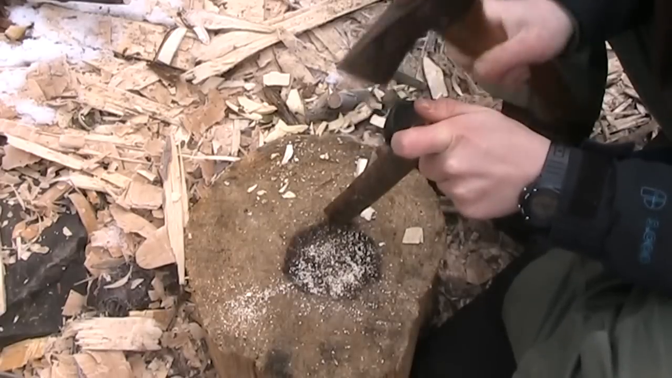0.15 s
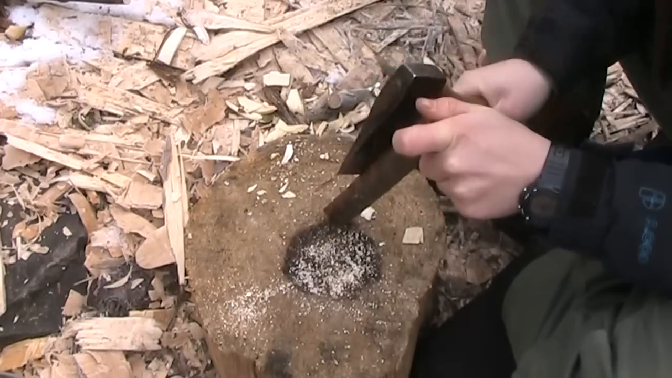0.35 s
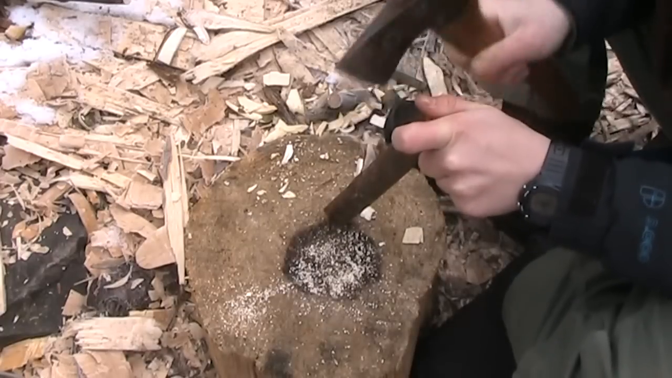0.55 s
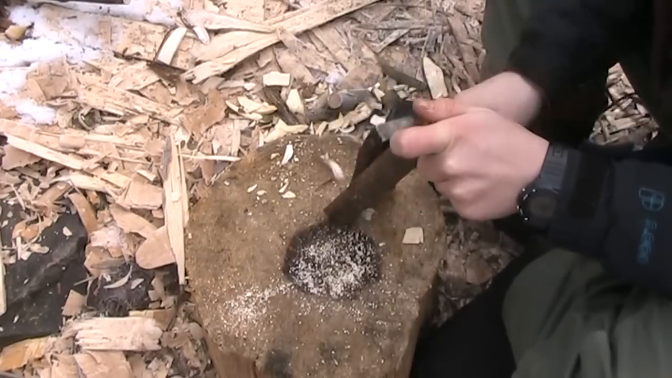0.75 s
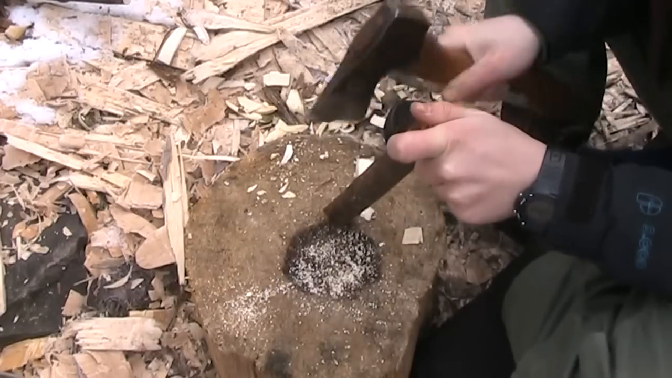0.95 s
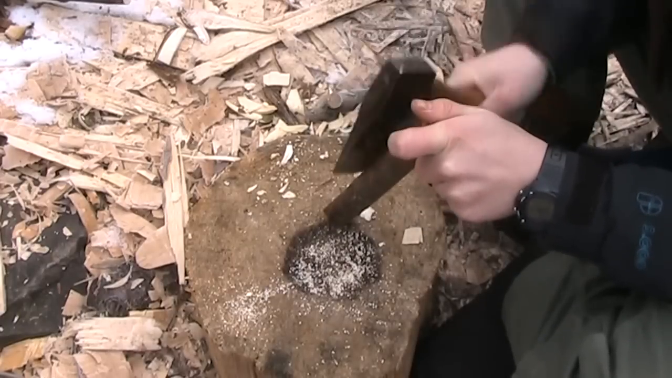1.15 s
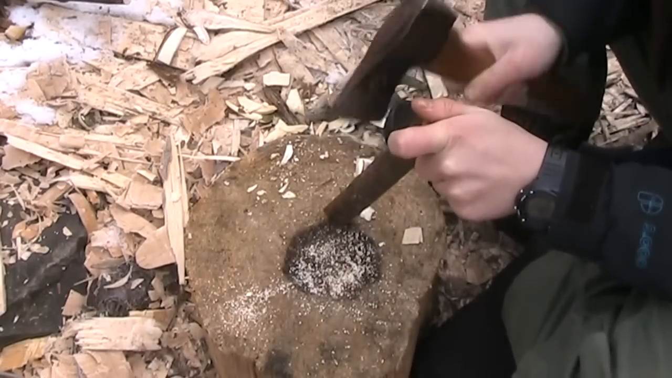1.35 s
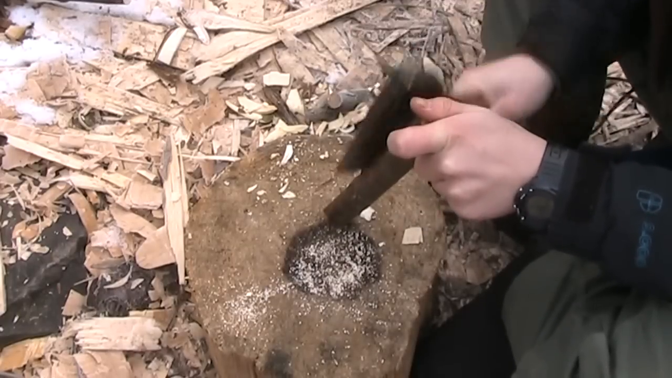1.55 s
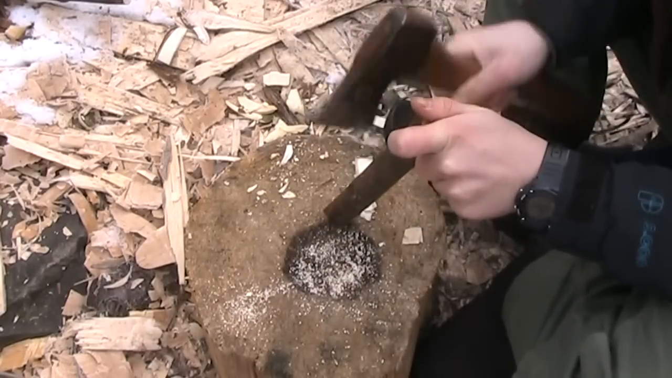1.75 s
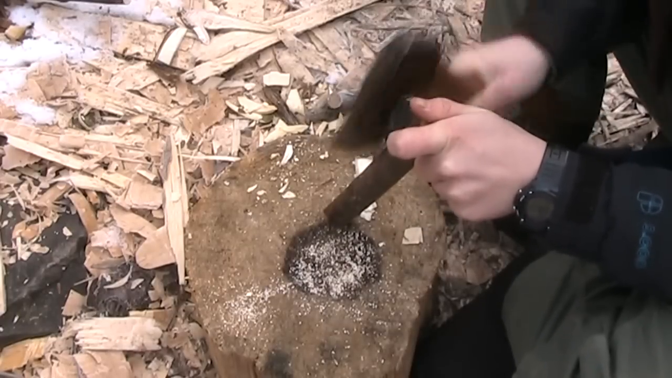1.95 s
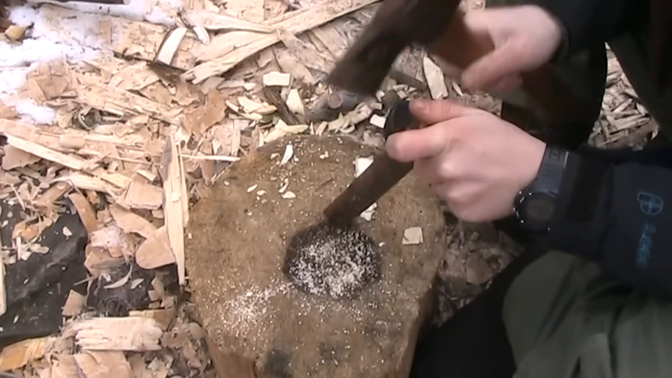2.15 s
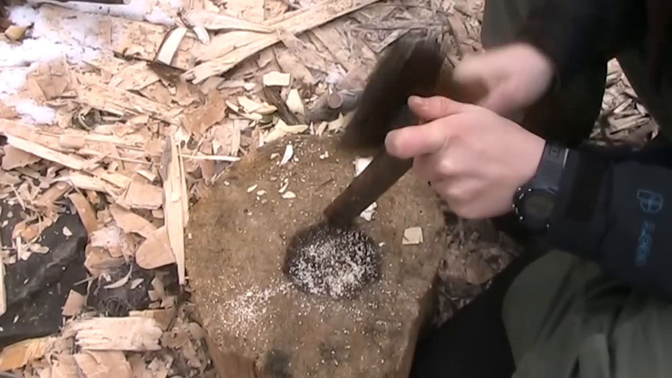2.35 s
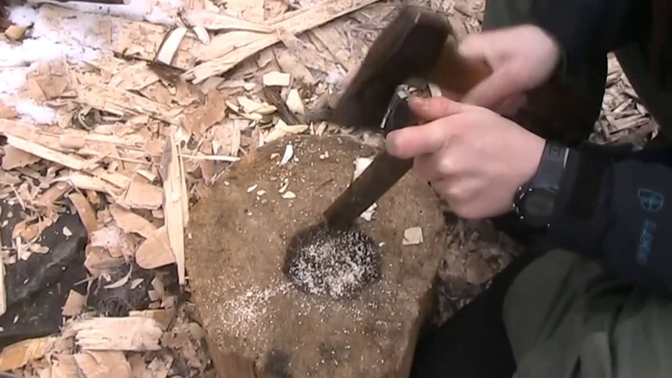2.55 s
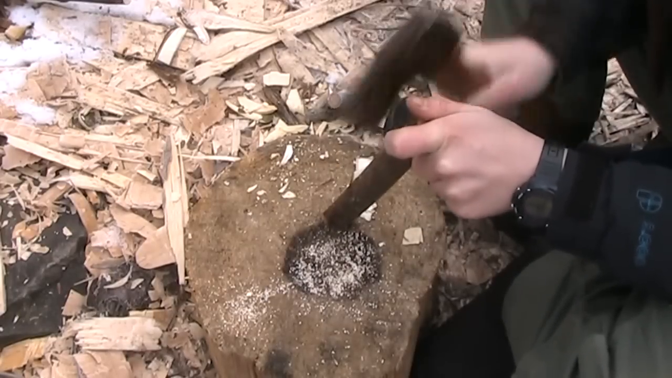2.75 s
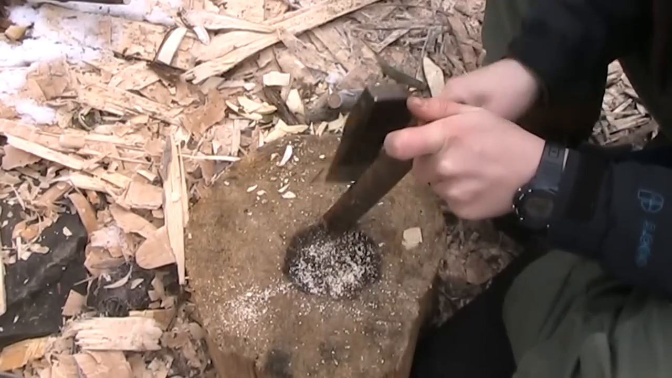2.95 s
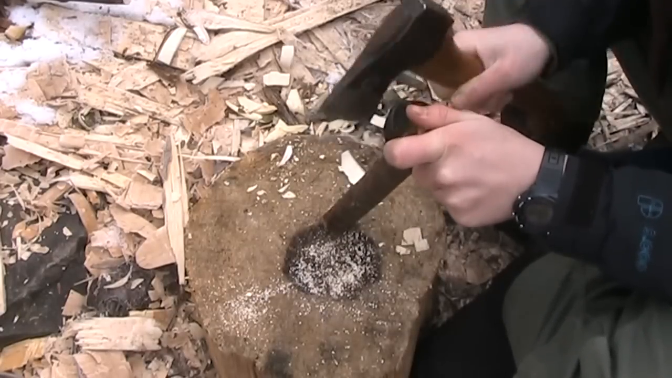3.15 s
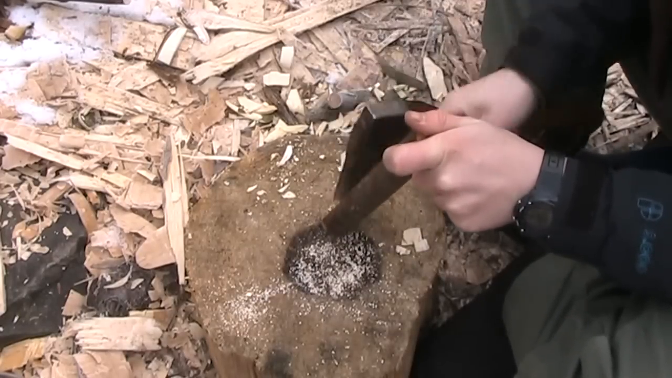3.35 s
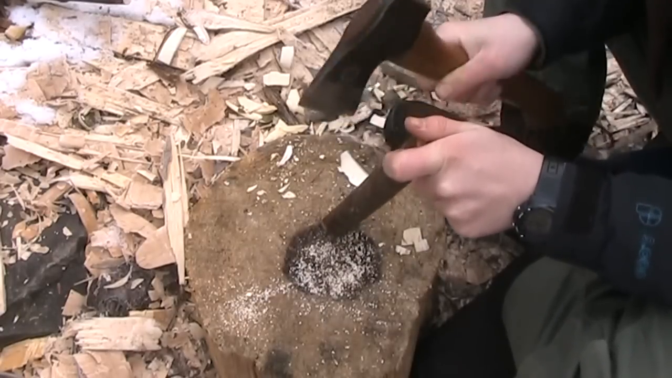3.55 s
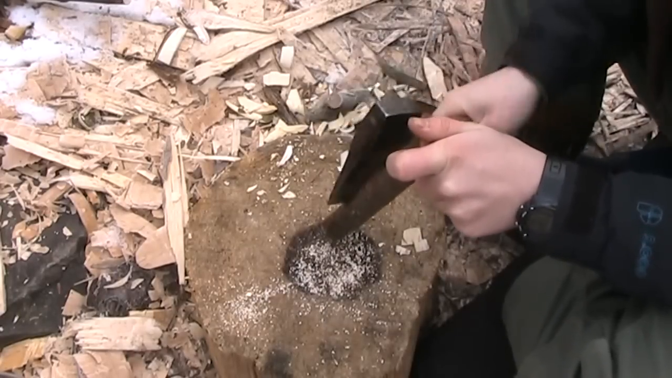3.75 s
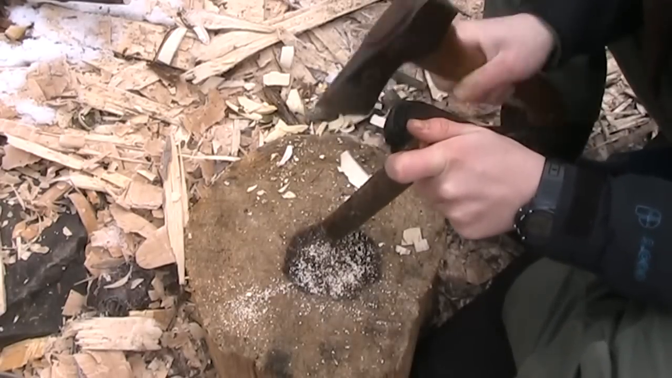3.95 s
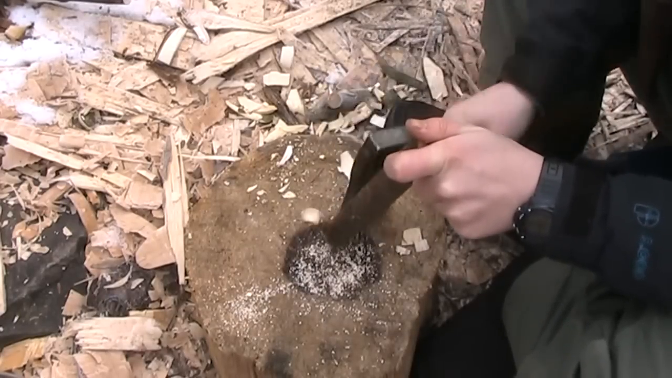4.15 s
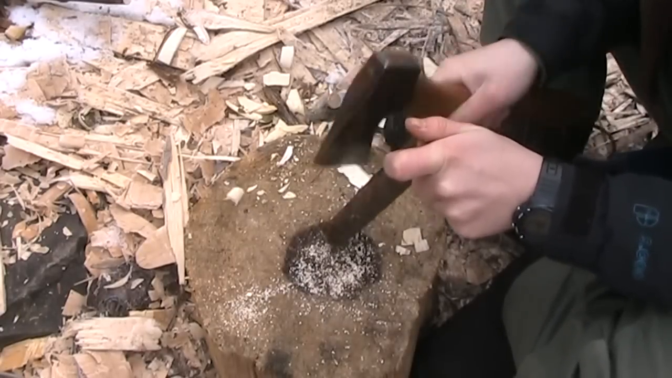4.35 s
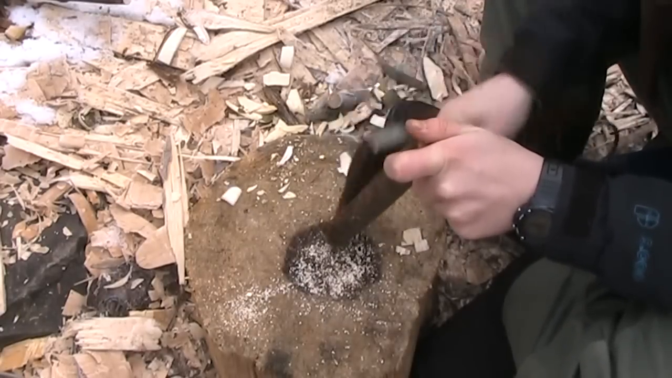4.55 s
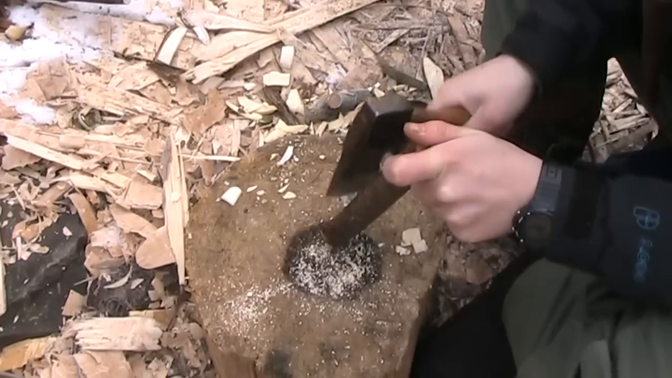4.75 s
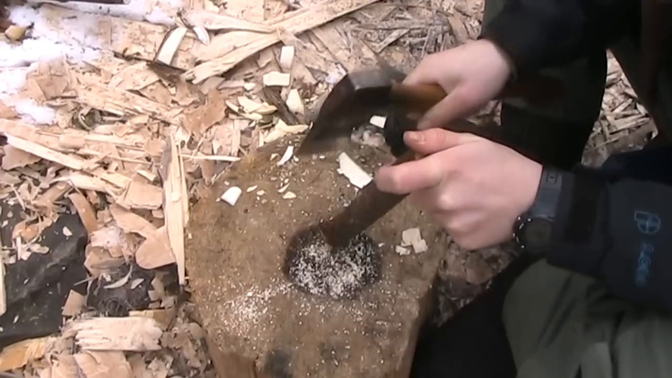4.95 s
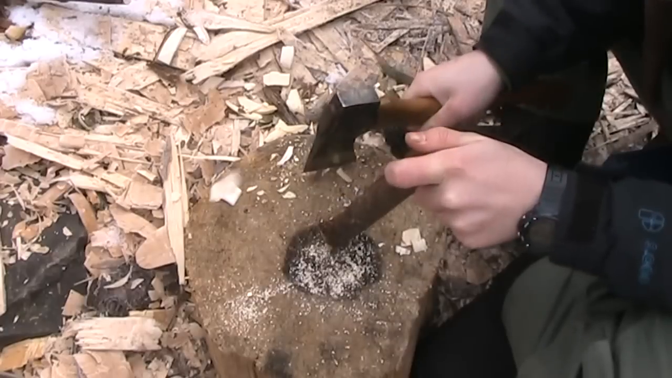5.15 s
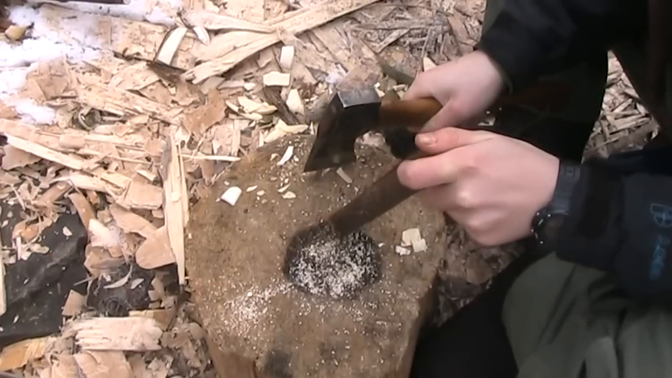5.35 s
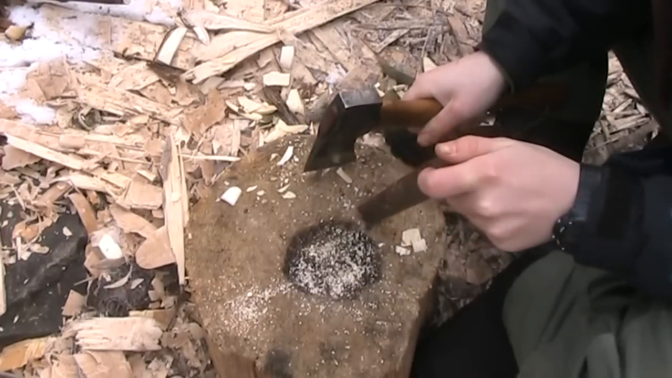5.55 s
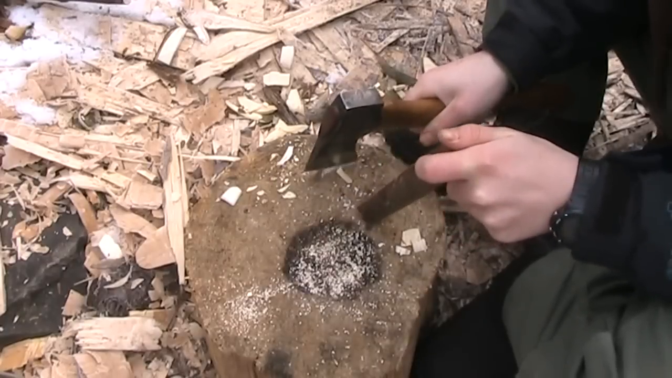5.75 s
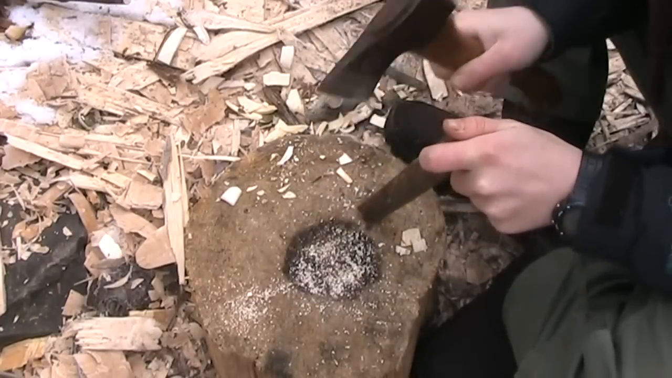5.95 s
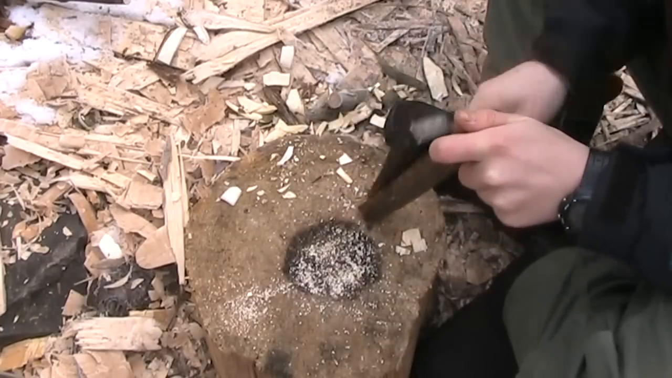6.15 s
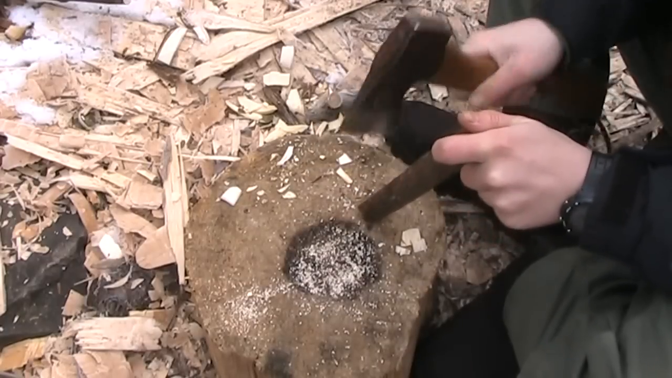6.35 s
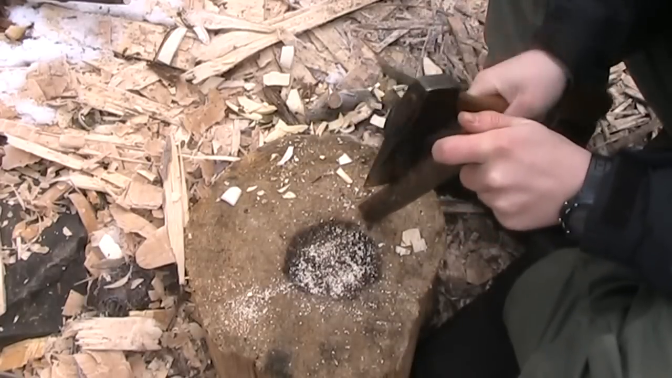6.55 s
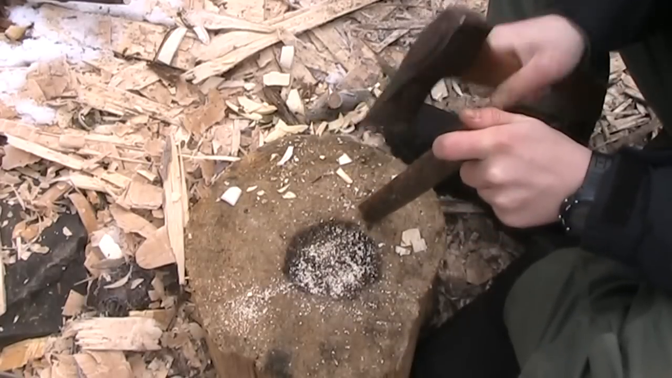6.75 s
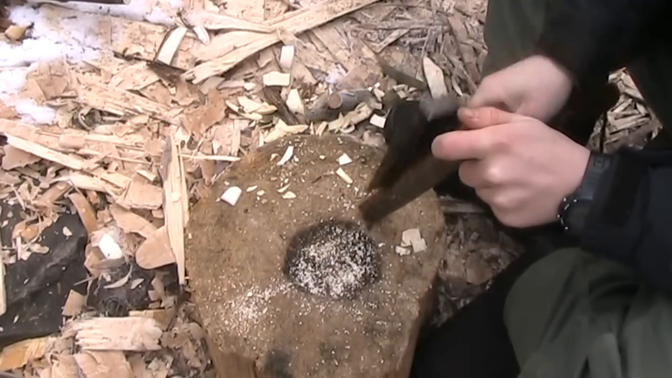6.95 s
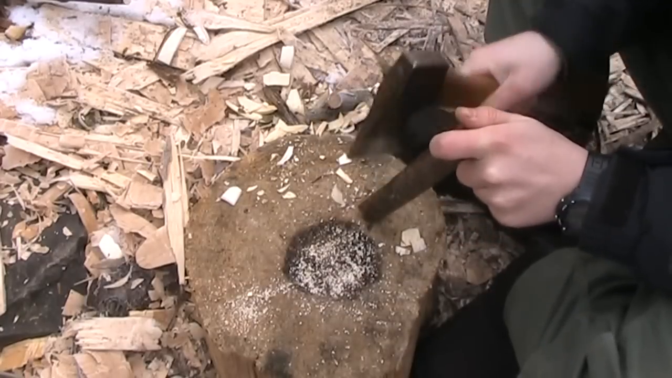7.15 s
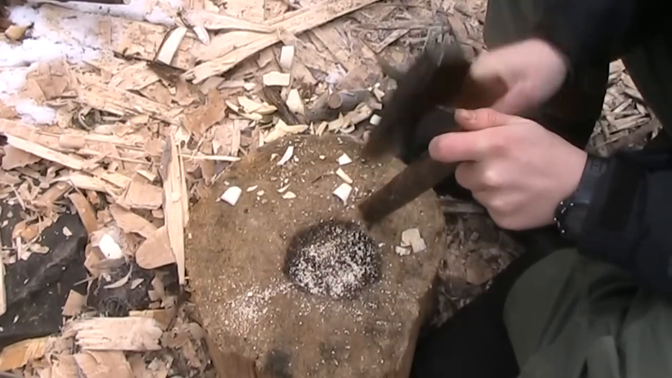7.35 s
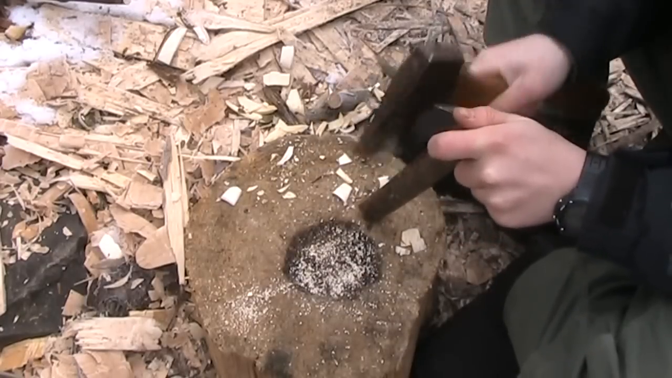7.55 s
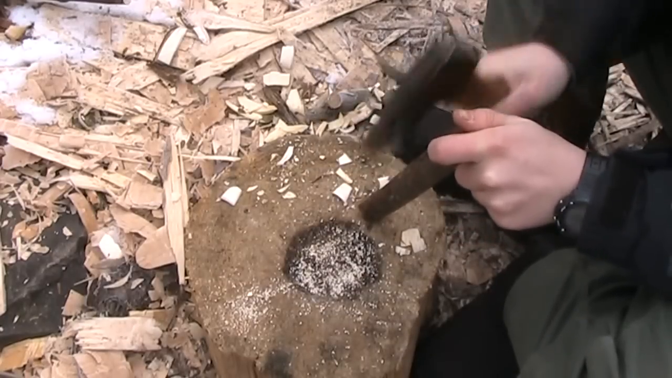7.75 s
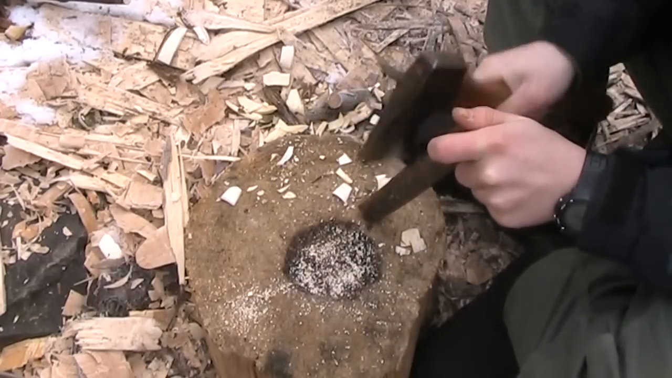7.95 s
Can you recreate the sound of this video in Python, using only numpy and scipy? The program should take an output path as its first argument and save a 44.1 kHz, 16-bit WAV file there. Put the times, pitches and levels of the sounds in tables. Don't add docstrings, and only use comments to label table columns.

```python
import sys
import numpy as np
from scipy import signal
from scipy.fft import rfft, irfft, next_fast_len
from scipy.io import wavfile
from scipy.ndimage import uniform_filter1d, map_coordinates

SR = 44100
rng = np.random.default_rng(int(sys.argv[2]) if len(sys.argv) > 2 else 0)


def level_to_linear(level):
    exponent = np.asarray(level, float) / 20
    return 10 ** exponent


def transcribe(signal):
    frames = np.atleast_2d(signal).T
    limited = np.clip(frames, -1, 1)
    pcm = np.round(limited * 32767).astype(np.int16)
    wavfile.write(sys.argv[1], SR, pcm)


N = 352359

# start [s], knock [dB], stick bending [dB], steel [dB], fibre snap [dB].
BITES = [(0.256, -29, -21.5, -36, -32), (0.6597, -6, -13, -24, -20.5), (0.6738, -0.5, -11, -11.5, -13.5),
         (1.1098, -10.5, -24.5, -31.5, -24), (1.5089, 1, -11.5, -11, -36.5), (1.93, 4.5, -11.5, -14, -22),
         (2.3254, 3, -10, -12.5, -21.5), (2.7385, 4.5, -10.5, -12.5, -9), (3.1957, 1.5, -17, -17.5, -19.5),
         (3.6445, 0.5, -12.5, -16, -19), (4.063, 1.5, -17.5, -11, -16.5), (4.4946, -1.5, -17.5, -16.5, -23),
         (4.966, -13, -19, -9, -10), (6.082, 1, -15.5, -18.5, -14), (6.5064, 3, -9.5, -8.5, -16),
         (6.8968, 0.5, -16, -19, -26.5), (7.3431, -2.5, -13.5, -20, -40), (7.7438, 3.5, -12, -9, -20)]
# knock [Hz], bending [Hz], steel [Hz], damping [factor].
GRIPS = [(1600, 1050, 3400, 2.9), (1670, 1120, 4200, 1.3), (1900, 990, 4830, 1.2), (1710, 1210, 6600, 0.59),
         (1710, 1140, 4500, 1.09), (1744, 1180, 4150, 1.2), (1755, 1130, 4500, 1.33),
         (1835, 1190, 4480, 1.32), (1800, 1160, 4225, 0.75), (1900, 1290, 4320, 1.1),
         (1790, 1250, 4140, 0.79), (1735, 1224, 4360, 0.85), (1580, 1040, 4820, 1.9),
         (1860, 1135, 4370, 0.92), (1814, 1220, 4380, 1.2), (1675, 1200, 4420, 0.93),
         (1700, 1294, 4320, 0.93), (1810, 1310, 4550, 1.18)]
# low, middle and high mode [dB over the knock].
FREED = [(10, 1, -17.5), (-1.5, -7.5, -30.5), (-18.5, -27, -5), (0.5, -0.5, -11), (-10, 0, -4),
         (-16, -17, -4.5), (-9, -23, 1), (-16.5, -11, 1.5), (-9.5, -17.5, -12.5), (-19, -24, -29),
         (-12, -19, -7), (-6.5, -34, -16), (-4.5, 7, -10.5), (-15.5, -16.5, -6), (-16.5, -0.5, -7),
         (-19.5, -4, -4.5), (-4.5, -28, -20.5), (-20, -28, -9.5)]
# peak of first swing [s], first swing [dB], pitch [Hz], second swing [dB over the
THUDS = [
    (0.7199, -2.8, 334, -7.8),
    (2.7799, -5.7, 345, -4.9),
    (3.2474, -3.1, 337, -6.6),
    (4.1045, -5.5, 328, -5.3),
    (4.5291, -1.1, 327, -9.7),
    (4.9686, -10.2, 359, -3.5),
    (6.1426, -5.1, 338, -3.6),
    (6.9595, -5.4, 340, -2.1),
]
# share of steel pitch [ratio], width [Hz], level [dB].
STEEL = [(1, 270, -0.5), (1.08, 320, -11.5), (1.159, 299.5, -13)]
# frequency [Hz], width [Hz], level [dB].
HEAD = [(4200, 82, -17), (5860, 240, -13), (6850, 310, -10), (10780, 1800, -16), (4220, 39, -28)]
LOOSE_GRIP = (2114, 1210, 4369)
CRACK_LENGTH = SR // 16


def unit(x):
    return x / np.sqrt(np.mean(x ** 2) + 1e-20)


def along(points, hz):
    f, v = np.transpose(points)
    return np.interp(np.log(hz + 1), np.log(f + 1), v)


def curves(rows, outside=None):
    s, *cols = np.transpose(rows)
    return [np.interp(np.arange(N) / SR, s, c, outside, outside) for c in cols]


def wobble(rate):
    knots = rng.standard_normal(int(N * rate / SR) + 4)
    return map_coordinates(knots, [np.arange(N) * rate / SR])


def filtered(x, response):
    m = next_fast_len(N + SR // 2)
    return irfft(rfft(x, m) * response(np.fft.rfftfreq(m, 1 / SR)), m)[..., :N]


def colour(x, spectrum):
    return filtered(x, lambda hz: level_to_linear(along(spectrum, hz)))


def resonate(x, modes):
    def body(f):
        total = 0
        for k, (c, w, db) in enumerate(modes):
            total = total + (-1) ** k * level_to_linear(db) * 1j * f * w / (c * c - f * f + 1j * f * w)
        return total
    return filtered(x, body)


def band(x, order, hz, kind):
    return signal.sosfilt(signal.butter(order, hz, kind, fs=SR, output="sos"), x)


def rush(spectrum, patchy_db):
    # frequency [Hz], side over mid [dB].
    side_over_mid = [(60, -27), (110, -18), (200, -4), (380, 1), (700, 2), (1290, 2), (2380, 3), (4400, 1),
                     (8120, -1), (15000, 1)]
    z = signal.stft(rng.standard_normal((2, N)), nperseg=512)[2]
    field = uniform_filter1d(uniform_filter1d(rng.standard_normal(z.shape[1:]), 6, 0), 14, 1)
    pair = signal.istft(z * level_to_linear(patchy_db * unit(field)), nperseg=512)[1][:, :N]

    def spread(hz):
        angle = np.arctan(level_to_linear(along(side_over_mid, hz)))
        return level_to_linear(along(spectrum, hz)) * [np.cos(angle), np.sin(angle)]
    mid, side = filtered(pair, spread)
    return unit(np.array([mid + side, mid - side]))


def crack(grip, freed, knock_db, bend_db, steel_db, snap_db, damping, snap_t60, rise,
          climb=0, thin=1, swell=0, head_db=0, steel_climb=0, lag=0):
    # share of knock pitch [ratio], width [Hz], level [dB].
    knock_modes = [(0.9054, 239, 5), (0.773, 160, -7.5)]
    # share of bending pitch [ratio], width [Hz], level [dB].
    bend_modes = [(0.719, 275.5, -2), (1.002, 413, 11)]
    # frequency [Hz], width [Hz].
    side_modes = [(630, 168), (2290, 220), (2890, 237)]
    t = np.arange(CRACK_LENGTH) / SR
    knock_hz, bend_hz, steel_hz = grip
    wood, metal = rise + lag, rise + swell
    # Hz, width Hz, dB, rise s, climb Hz per ms
    modes = [(share * knock_hz, w, db + knock_db, wood, climb) for share, w, db in knock_modes]
    modes += [(hz, w, db + knock_db, wood, 0) for (hz, w), db in zip(side_modes, freed)]
    modes += [(share * bend_hz, w, db + bend_db, wood + 0.00017, 0) for share, w, db in bend_modes]
    modes += [(share * steel_hz, thin * w, db + steel_db, metal, steel_climb) for share, w, db in STEEL]
    modes += [(hz, thin * w, db + steel_db + head_db, metal, 0) for hz, w, db in HEAD]
    modes += [(4480, 7700, snap_db - 21, rise, 0)]
    ring = 0
    for hz, w, db, start, up in modes:
        detune, luck_db = rng.standard_normal(2) * [.006, 1]
        swelling = 1 - np.exp(-(t / start) ** 2)
        decay = np.exp(-np.pi * damping * w * t)
        tone = np.sin(2 * np.pi * (hz * (1 + detune) + 1000 * up * t / 2) * t)
        ring = ring + level_to_linear(db + luck_db) * swelling * decay * tone
    snap = band(rng.standard_normal((2, len(t))), 3, [4500, 13500], "bandpass")
    snap = snap * level_to_linear(snap_db - 60 * t / snap_t60) * (1 - np.exp(-(t / rise) ** 2))
    return -(ring + snap[0] + 0.41 * snap[1] * [[1], [-1]])


def place(out, s, sound, lean_db):
    out[:, round(s * SR):][:, :CRACK_LENGTH] += sound * level_to_linear(lean_db * np.array([[.5], [-.5]]))


def bites():
    knock_climbs = [0.1, 5, 0.1, 6.1, 20, 23, 22.4, 10, 6.8, 13, 27, 76, 0.1, 46, 13, 140, 4.7, 20]
    # first inward spike [dB], free head [dB], steel climb [Hz per ms].
    edge_rows = [(-34, -6, 5), (-10.5, -3.5, 5), (-12.5, -6, 5), (-33, -6, 4.5), (-10.5, 2.5, 5),
                 (-9.5, 5.5, 5), (-8, -0.5, 5), (-6.5, -11, 5), (-11.5, -1, 4.6), (-17, -12.5, 5),
                 (-14, -5.5, 5), (-27.5, -12, 5), (-6.5, -15.5, 5), (-7, -1.5, 15), (-6, -3.5, 5),
                 (-2.5, -1, 5), (-14.5, -9.5, 30), (-8, -4, 5)]
    out = np.zeros((2, N + SR))
    t = np.arange(CRACK_LENGTH) / SR
    for row, (*grip, damping), freed, climb, edge in zip(BITES, GRIPS, FREED, knock_climbs, edge_rows):
        s, knock_db, bend_db, steel_db, snap_db = row
        spike_db, head_db, steel_climb = edge
        sound = crack(grip, freed, knock_db - 3.0, bend_db + 12.0, steel_db + 10.0, snap_db + 3.5, damping,
                      snap_t60=0.0059, rise=0.0002, climb=climb, head_db=head_db,
                      steel_climb=steel_climb, lag=0.00045)
        spike = level_to_linear(spike_db) * np.exp(-((t - 0.00028) / 0.00008) ** 2)
        place(out, s - .0003, sound - spike, 2.4)
    return out[:, :N]


def jolts():
    # start [s], knock [dB], stick bending [dB], steel [dB], fibre snap [dB].
    jolt_rows = [(0.265, -20, -12, -32, -28), (0.2595, -37, -37, -27, -17), (0.2741, -26, -6.5, -11, -28),
                 (0.2762, -20, -5, -13, -24.5), (0.6607, -6.5, -11.5, -31, -21),
                 (0.677, -11.5, -29, -16, -17.5), (1.519, -38.5, -17.5, -17.5, -38.5),
                 (1.5217, -26, -37, -22, -33), (1.525, -43.5, -22, -23, -33.5),
                 (2.3343, -43.5, -3, -27, -17.5), (2.7486, -18.5, -15.5, -19, -26.5),
                 (3.2082, -41, -33, -14.5, -35), (4.0718, -16, -6.5, -10.5, -39.5),
                 (4.5, -33, -20, -17.5, -24), (6.092, -40.5, -22.5, -13, -43),
                 (6.9094, -15.5, -14.5, -24, -26.5), (7.347, -22, -36, -12, -25),
                 (7.748, -44, -17.5, -25, -35.5)]
    # steel [Hz], share of stick pitch [ratio], damping [factor].
    jolt_grips = [(4320, .99, 2.1), (4450, 0.93, 1.6), (4320, 0.74, 1.87), (4430, 1.1, 1.5),
                  (4300, 1.1, 0.69), (4850, 1.4, 1.6), (4500, .99, 1.6), (4500, .99, 1.6), (4500, 1.1, 1.5),
                  (4200, .99, 2.2), (5030, .99, 1.4), (4350, 1.1, 1.6), (4390, 1.1, 1.84), (4300, 0.9, 1.2),
                  (4220, 0.76, 2.1), (4520, 1.03, 1.12), (4580, 1.6, 1.6), (4740, 0.9, 1.5)]
    out = np.zeros((2, N + SR))
    starts = [row[0] for row in BITES]
    for (s, knock_db, bend_db, steel_db, snap_db), (steel_hz, share, damping) in zip(jolt_rows, jolt_grips):
        bite = np.searchsorted(starts, s) - 1
        knock_hz, bend_hz, *_ = GRIPS[bite]
        sound = crack((share * knock_hz, share * bend_hz, steel_hz), FREED[bite],
                      knock_db + 3.5, bend_db + 10, steel_db + 14.5, snap_db + 6.0, damping,
                      snap_t60=0.012, rise=0.00088, thin=0.85, swell=0.00068, head_db=-8)
        place(out, s, sound, 2.0 + 1.4 * rng.standard_normal())
    return out[:, :N]


def late_breaks():
    # start [s], knock [dB], stick bending [dB], brightness [dB].
    tap_rows = [(0.438, -47, -39.5, -66), (0.65, -60.5, -42, -63.5), (0.6892, -22.5, -27, -42.5),
                (0.705, -42, -29, -37.5), (0.8083, -40.5, -28.5, -66), (0.8318, -43, -40, -50),
                (0.934, -33, -72, -39.5), (1.6507, -57, -43, -44), (1.9498, -32, -61, -44.5),
                (2.758, -20, -36, -40), (2.777, -52, -45, -21), (2.7778, -50, -43, -10.5),
                (2.7826, -55, -50, -25.5), (2.77, -34, -37, -45.5), (2.8857, -42, -54.5, -48),
                (2.9118, -58, -32, -49), (3.1099, -39, -42.5, -45), (3.2146, -46, -32, -50.5),
                (3.224, -53.5, -37, -56.5), (3.2319, -29, -37, -32), (4.0826, -26, -30.5, -46),
                (4.0942, -41.5, -37, -42), (4.088, -41, -33, -55), (4.527, -21.5, -17, -36),
                (4.5097, -36, -26, -47.5), (4.516, -42, -27, -49), (4.522, -41.5, -22, -47),
                (6.101, -47, -34, -57.5), (6.11, -46, -40.5, -60), (6.928, -45, -35, -55),
                (4.2324, -42.5, -46, -48), (6.1184, -21.5, -25.5, -34.5), (6.9354, -34, -33, -26),
                (7.055, -44, -52, -44), (7.713, -55, -40.5, -58)]
    tap_grips = [(.99, 2.1), (.99, 1.1), (.99, 1.5), (.99, 1.7), (.99, 1.92), (.99, 2.2), (.99, 2.7),
                 (.99, 2.2), (.99, 1.2), (.99, 1.3), (.99, 2.2), (.99, 2.8), (.99, 1.9), (.99, 1.3),
                 (.99, 1.9), (.99, 2.04), (.99, 1.9), (.9, 1.4), (1.05, 1.1), (.95, 0.85), (1.1, 1.7),
                 (1.05, 1.2), (1.1, 1.4), (.99, 1.2), (.99, 1.9), (.99, 2.3), (.99, 2.5), (.99, 1.5),
                 (1.05, 1.2), (1.05, 1.3), (.99, 2.2), (1.08, 0.88), (.95, 1.7), (.99, 1.8), (.99, 2.2)]
    # start [s], steel [dB], fibre snap [dB].
    chip_rows = [(0.4115, -44.5, -48.5), (0.7501, -65.5, -47), (0.9587, -68, -53), (0.9674, -48, -37.5),
                 (0.9732, -55, -37), (1.0132, -45, -47), (1.5415, -45.5, -27.5), (2.1278, -50, -40),
                 (2.159, -70, -47.5), (2.6877, -47, -65.5), (2.9383, -77, -48), (2.9609, -42, -36.5),
                 (2.9671, -41, -39.5), (3.036, -52, -24.5), (3.0386, -34, -18.5), (3.0684, -44, -37),
                 (3.0947, -66, -43), (2.973, -52, -48), (3.117, -56, -47.5), (3.136, -64, -50),
                 (3.14, -66, -51), (3.3033, -44, -37.5), (3.8274, -44.5, -46), (5.0041, -44, -45.5),
                 (5.015, -47, -41.5), (5.145, -66, -37.5), (5.1735, -46, -51), (5.1902, -59, -43),
                 (5.3645, -35, -18.5), (5.3687, -24.5, -21.5), (5.3766, -35, -35), (5.441, -49, -37),
                 (7.2713, -60, -45), (3.2643, -60, -40.5), (5.398, -60, -42), (5.478, -50, -45),
                 (5.4965, -70, -48), (4.984, -44, -46)]
    landing_db = np.array((-16, -19.5, -28.5, -28))
    # start s, knock, bending, steel, snap dB, stick pitch share, damping
    events = []
    for (s, knock_db, bend_db, bright_db), grip in zip(tap_rows, tap_grips):
        events.append((s, knock_db, bend_db, bright_db - 8.0, bright_db, *grip))
    for s, steel_db, snap_db in chip_rows:
        events.append((s, snap_db - 15.5, snap_db - 32, steel_db, snap_db, 1, 1.95))
    for s, db, _, _ in THUDS:
        if db > -8:
            events.append((s - 0.00066, *(db + landing_db), 1, 1.3))
    out = np.zeros((2, N + SR))
    knock_hz, bend_hz, steel_hz = LOOSE_GRIP
    for s, knock_db, bend_db, steel_db, snap_db, share, damping in events:
        sound = crack((share * knock_hz, share * bend_hz, steel_hz), (-17.5, -8.5, -1.5),
                      knock_db + 2.0, bend_db + 12.0, steel_db + 9.0, snap_db + 5.0, damping,
                      snap_t60=0.0095, rise=0.00042)
        place(out, s, sound, 3.0 + 0.89 * rng.standard_normal())
    return out[:, :N]


def thuds():
    # peak of first swing [s], first swing [dB], pitch [Hz], second swing [dB over
    chip_bumps = [
        (2.912, -46, 234, 19),
        (4.235, -40, 206, -2),
    ]
    # peak of first swing [s], level [dB], pitch [Hz].
    settle_rows = [
        (0.284, -19, 227),
        (1.1251, -20, 289.5),
        (1.521, -29.5, 265),
        (1.9415, -25.5, 244),
        (2.345, -26, 256),
        (3.658, -26, 248.4),
        (6.516, -28, 260),
        (7.3597, -24.5, 255),
        (7.7544, -28, 279),
    ]
    free_ring_db = [0.5, -0.5, -3, 0, -2.5, 4.5, 3, 5]
    # frequency [Hz], width [Hz], level [dB].
    block_modes = [(324, 20, 1), (360, 71, 6.5), (543, 480, -0.5), (867, 500, -5.5), (1236, 90, 1.5),
                   (1895, 160, -23)]
    swing, drive, t = np.zeros(N + SR), np.zeros(N + SR), np.arange(SR // 6) / SR
    soft = chip_bumps + [(*row, 1.5) for row in settle_rows]
    for (s, db, hz, second_db), ring_db in zip(THUDS + soft, free_ring_db + [0] * len(soft)):
        cycle = np.arange(-.8 * SR / hz, 2.4 * SR / hz) * hz / SR
        stop = np.exp(-np.clip(cycle / 1.03, 0, 9) ** 6)
        third_swing = 0.061 * np.exp(-np.clip(cycle / 1.75, 0, 9) ** 6)
        window = np.clip((cycle + 0.72) / 0.69, 0, 1) * (stop + third_swing)
        wave = np.cos(2 * np.pi * cycle) + 0.097 * np.cos(3 * 2 * np.pi * cycle)
        start = round((s - .8 / hz) * SR)
        swing[start:][:len(cycle)] += level_to_linear(db + 0.96 + 0.77 * second_db * cycle) * window * wave
        knock = level_to_linear(21) * np.exp(-((t - .0021) / .0001) ** 2) / 8
        rattle = level_to_linear(-4.5 - 60 * t / 0.098) * rng.standard_normal(len(t))
        drive[start:][:len(t)] += level_to_linear(db + ring_db + max(second_db, -3)) * (knock + rattle)
    return swing[:N] + resonate(drive[:N], block_modes)


def tearing():
    # start [s], burst [dB], held rip [dB], hold [s], fizz over body [dB].
    tear_rows = [(0.256, -24, -15, 0.0073, -11.5), (0.276, -24.5, -42, 0.005, -20),
                 (0.663, -24, -35, 0.044, -16), (1.1087, -21, -20, 0.0045, -13.5),
                 (1.508, -30, -29, 0.021, -4.5), (1.932, -19.5, -32.5, 0.0081, -17),
                 (2.325, -23, -20.5, 0.0079, -21.5), (2.737, -16.5, -32, 0.046, -6),
                 (3.035, -44.5, -69.5, 0.0042, 27.5), (3.199, -25, -36, 0.051, -10),
                 (3.646, -22.5, -32.5, 0.011, -8.5), (4.065, -29, -33, 0.022, -19.5),
                 (4.497, -20.5, -35.5, 0.032, -26), (4.964, -19.5, -43, 0.012, 12),
                 (6.087, -20, -39, 0.071, -23), (6.509, -27, -38, 0.015, -15), (6.9, -26, -42, 0.082, 2),
                 (7.344, -21.5, -35.5, 0.022, -1.5), (7.744, -23, -61, 0.014, -19.5)]
    # frequency [Hz], level [dB per Hz].
    fizz_spectrum = [(1500, -48.5), (3500, 8.5), (6000, 6), (9000, 2), (12000, -13.5), (14500, -8.5),
                     (16500, -27)]
    body, fizz, t = np.zeros(N + SR), np.zeros(N + SR), np.arange(SR // 4) / SR
    for s, burst_db, held_db, held_s, fizz_db in tear_rows:
        burst = level_to_linear(burst_db - 1196.5 * t)
        release_db = 902 * np.maximum(t - held_s, 0)
        start = round(s * SR)
        body[start:][:len(t)] += np.maximum(burst, level_to_linear(held_db - release_db))
        lingering = level_to_linear(held_db - 0.38 * release_db)
        fizz[start:][:len(t)] += np.maximum(burst, lingering) * level_to_linear(fizz_db)
    clumps_db = np.array([3 * wobble(450), 3 * wobble(300), 3 * wobble(600)])
    breaks = rng.standard_normal((3, N)) * level_to_linear(clumps_db)
    stick_modes = [(624, 350, 3.0), (1150, 175, 4), (1900, 370, 2.0), (2280, 400, -6)]
    blade_modes = [(share * LOOSE_GRIP[-1], w, db) for share, w, db in STEEL]
    stick = unit(resonate(breaks[0], stick_modes))
    steel = unit(resonate(breaks[1], blade_modes + HEAD))
    bright = unit(colour(breaks[2], fizz_spectrum))
    return level_to_linear(-2.5) * body[:N] * (stick + level_to_linear(-7.5) * steel) + level_to_linear(-13.5) * fizz[:N] * bright


def slides():
    # frequency [Hz], width [Hz], level [dB].
    drag_modes = [(660, 130, 2), (1300, 360, -18)]
    drag_s, drag_length_s, skim_s, skim_length_s = 7.291, 0.048, 4.9595, 0.0027
    t = np.arange(N) / SR
    drag = np.clip((t - drag_s) / 0.0035, 0, 1) * np.clip((drag_s + drag_length_s - t) / 0.021, 0, 1)
    skim = (t > skim_s) * (t < skim_s + skim_length_s)
    rasp = unit(band(rng.standard_normal(N), 2, [2500, 12000], "bandpass"))
    scuff = unit(resonate(rng.standard_normal(N), drag_modes))
    return level_to_linear(-47.5) * drag * scuff + level_to_linear(-31) * skim * rasp


def yard(x):
    # frequency [Hz], time to fall 60 dB [s], level [dB].
    decay_rows = [(200, 0.15, 5.5), (674, 0.1, 0.5), (1800, 0.33, -4.5), (4200, 0.53, -11.5),
                  (9940, 0.038, 9.5)]
    hz, t, z = signal.stft(rng.standard_normal((2, SR // 2)), SR, nperseg=256)
    centre, t60, db = np.transpose(decay_rows)
    level_db = along(np.c_[centre, db], hz)[:, None]
    fall_s = along(np.c_[centre, t60], hz)[:, None]
    tail = signal.istft(z * level_to_linear(level_db - 60 * t / fall_s), SR, nperseg=256)[1]
    late = np.pad(x, (200, 0))[None]
    return signal.fftconvolve(late, tail / np.linalg.norm(tail[0]), axes=1)[:, :N]


def sleeve():
    # time [s], level [dB].
    rub_curve = [(5.29, -61), (5.33, -51), (5.36, -47), (5.372, -33.5), (5.39, -44.5), (5.44, -45.5),
                 (5.478, -47.5), (5.49, -56), (5.53, -69)]
    # frequency [Hz], level [dB per Hz].
    cloth_spectrum = [(180, -27), (300, -4.5), (1480, -6.5), (1660, -5.5), (3890, -8), (9090, -13),
                      (14700, -23.5), (16000, -34)]
    level_db, = curves(rub_curve, outside=-120)
    grain = level_to_linear(1 + 1.5 * wobble(120) + 2 * wobble(900))
    return level_to_linear(level_db) * grain * rush(cloth_spectrum, patchy_db=1.5)


def bird():
    # start [s], length [s], start pitch [Hz], end pitch [Hz], level [dB].
    peep_rows = [
        (3.354, 0.098, 4420, 4500, -68),
        (3.365, 0.12, 3280, 3150, -73),
        (3.507, 0.049, 4510, 4350, -71),
        (3.551, 0.02, 3400, 3350, -69),
        (3.98, 0.046, 3250, 3300, -71),
        (4.12, 0.08, 4300, 4320, -81),
        (4.263, 0.06, 4100, 4180, -72),
        (5.19, 0.046, 1900, 1870, -70),
        (4.401, 0.0194, 3990, 3930, -66),
        (5.16, 0.048, 4200, 4200, -71),
    ]
    out = np.zeros(N)
    for s, length, start_hz, end_hz, db in peep_rows:
        hz = np.linspace(start_hz, end_hz, round(length * SR))
        flutter = 1 + 0.75 * np.sin(np.arange(len(hz)) / 95)
        whistle = np.sin(2 * np.pi * np.cumsum(hz) / SR)
        out[round(s * SR):][:len(hz)] += level_to_linear(db + 12.5) * np.hanning(len(hz)) * flutter * whistle
    return out


def outdoors():
    # time [s], strength [dB].
    breeze_curve = [(0.0, -63.5), (0.93, -59), (1.2, -62), (2.45, -63), (3.56, -59.5), (4.12, -60),
                    (4.56, -65), (5.25, -61.5), (6.05, -55.5), (6.23, -61), (7.28, -62.5), (7.99, -64)]
    # time [s], nearness [dB].
    traffic_curve = [(0, -53), (1.7, -51.5), (2.3, -52), (2.8, -53), (3.35, -50.5), (4.2, -52), (5.25, -52),
                     (6.05, -49), (7.28, -48.5), (7.99, -53)]
    # frequency [Hz], level [dB per Hz].
    hum_spectrum = [(18, -31), (30, -16.5), (42, -10), (55, 3.5), (68, 1.5), (80, -6), (112, -1.5),
                    (150, -11.5), (240, -12), (330, -59.5)]
    # frequency [Hz], level [dB per Hz].
    road_spectrum = [(94, -20), (160, -2.5), (173, -21), (253, -8), (451, -8), (1010, -10.5), (4000, -29),
                     (5200, -44.5), (8800, -120)]
    # frequency [Hz], level [dB per Hz].
    leaf_spectrum = [(900, -34.5), (1500, -0.5), (2570, -1.5), (3820, -3.5), (7680, -9), (11000, -12),
                     (14100, -15), (15740, -17), (15790, -70)]
    # frequency [Hz], level [dB per Hz].
    gust_spectrum = [(2000, -29), (4000, -7), (7000, 15), (11000, -4.5), (15700, -18.5), (15790, -73.5)]
    (breeze_db,), (traffic_db,) = curves(breeze_curve), curves(traffic_curve)
    breeze_swing = breeze_db - breeze_db.mean()
    road_db = 0.33 * breeze_swing + 0.33 * (traffic_db - traffic_db.mean())
    levels_db = [traffic_db - 0.9, road_db - 52.5, breeze_db + 5.0, -75 + 1.8 * breeze_swing]
    spectra = [hum_spectrum, road_spectrum, leaf_spectrum, gust_spectrum]
    out = 0
    for level_db, spectrum in zip(levels_db, spectra):
        out = out + level_to_linear(level_db) * level_to_linear(.7 * wobble(7)) * rush(spectrum, patchy_db=.8)
    return out


def hiss():
    # frequency [Hz], level [dB per Hz].
    hiss_spectrum = [(6000, -30), (11000, -6), (14000, 0), (15740, 0), (15790, -60)]
    return level_to_linear(-81) * rush(hiss_spectrum, patchy_db=-4.5)


def scene():
    small = bites() + jolts() + late_breaks() + (tearing() + slides()) * level_to_linear([[.8], [-.8]])
    small = band(small, 3, 220, "highpass")
    chop = band(small, 2, 14000, "lowpass") + band(thuds(), 2, 75, "highpass")
    echo = level_to_linear(-23.0) * yard(chop.mean(axis=0))
    return chop + echo + sleeve() + bird() + outdoors() + hiss()


def band_limit(x):
    return signal.sosfilt(signal.butter(12, 16000, fs=SR, output="sos"), x)


def record(dry):
    return band_limit(np.clip(dry, -1, 1))


dry = scene()
out = record(dry)
transcribe(out)
```